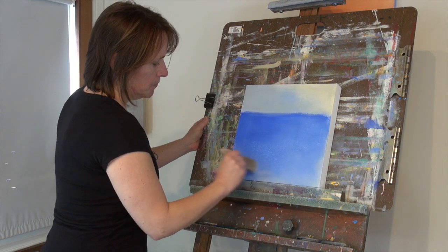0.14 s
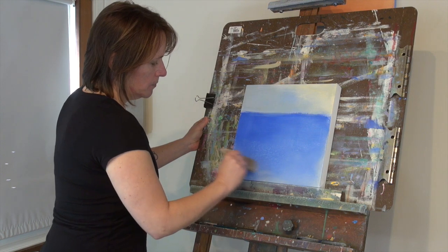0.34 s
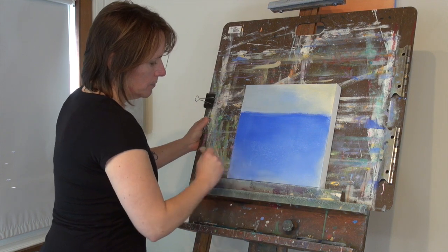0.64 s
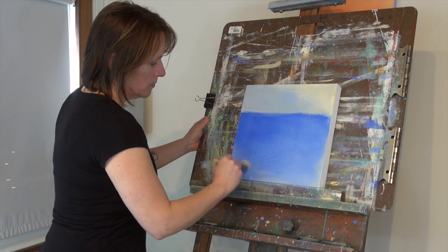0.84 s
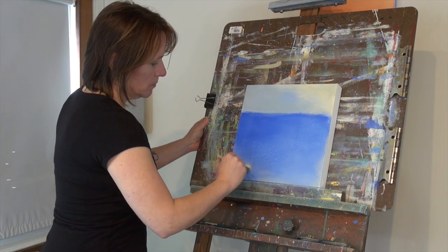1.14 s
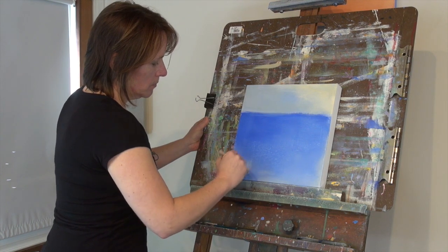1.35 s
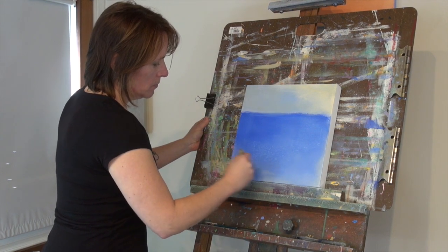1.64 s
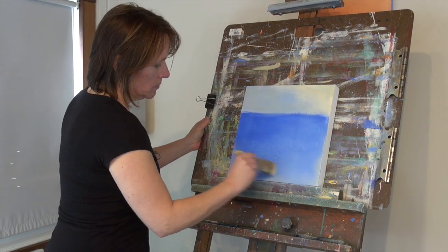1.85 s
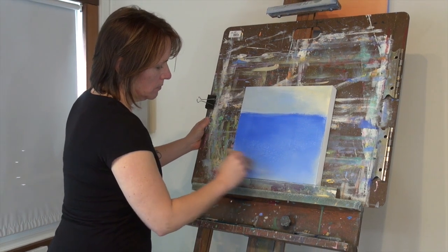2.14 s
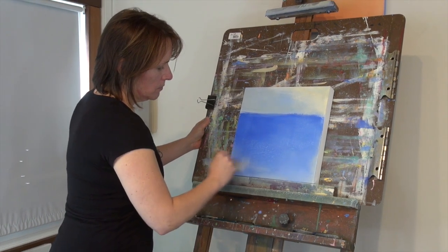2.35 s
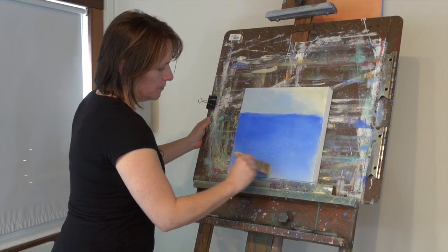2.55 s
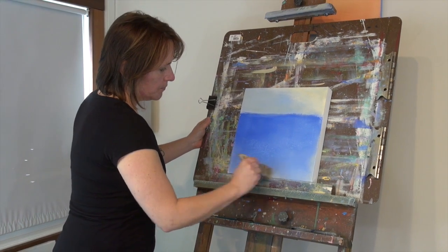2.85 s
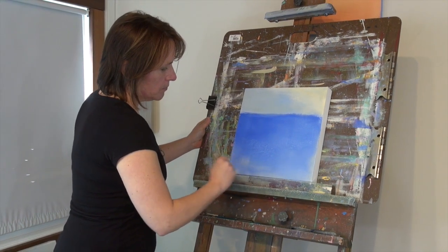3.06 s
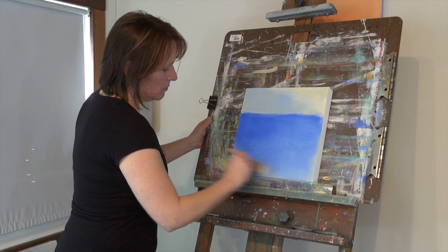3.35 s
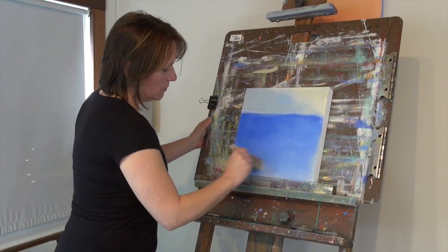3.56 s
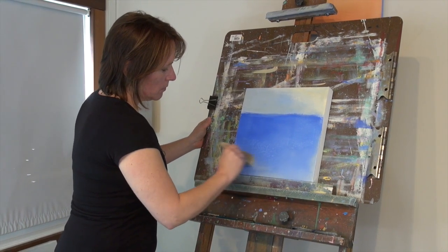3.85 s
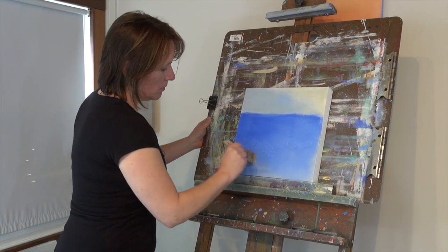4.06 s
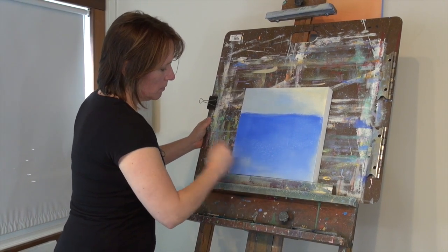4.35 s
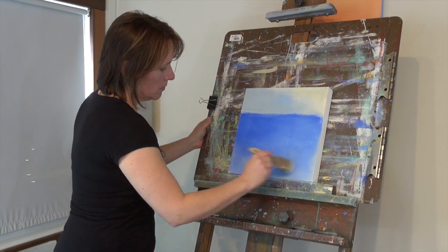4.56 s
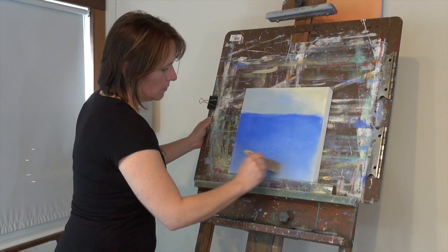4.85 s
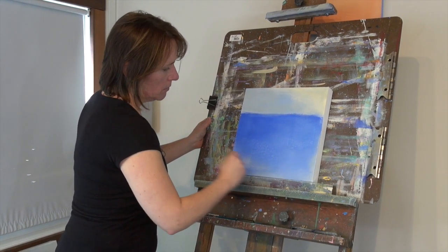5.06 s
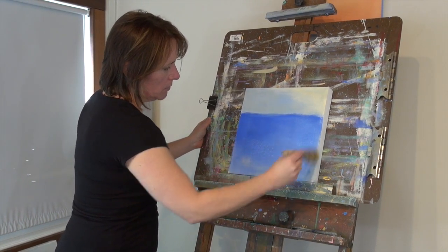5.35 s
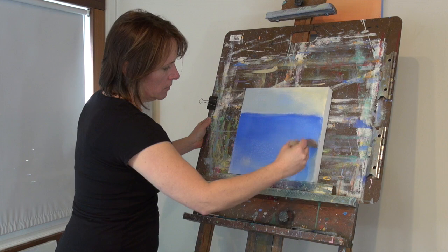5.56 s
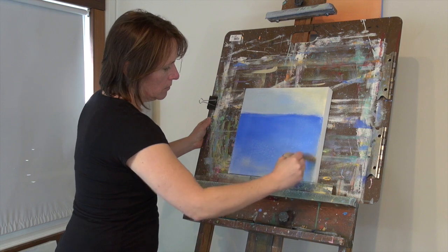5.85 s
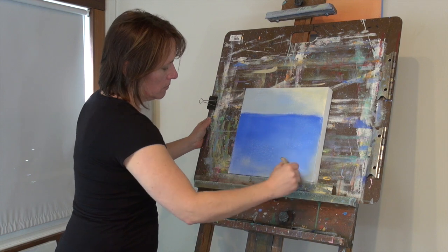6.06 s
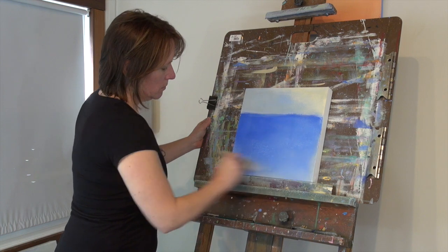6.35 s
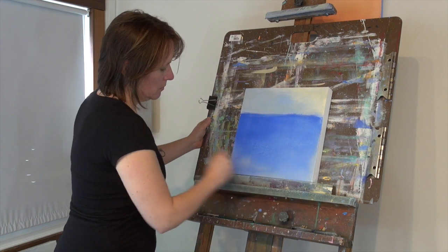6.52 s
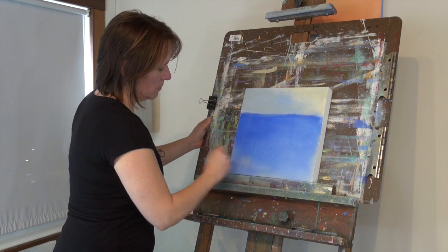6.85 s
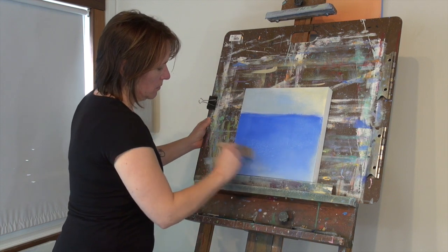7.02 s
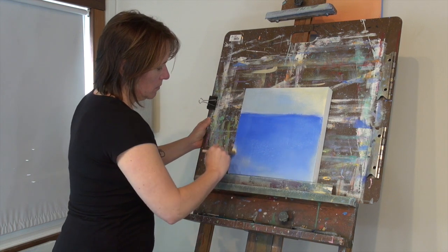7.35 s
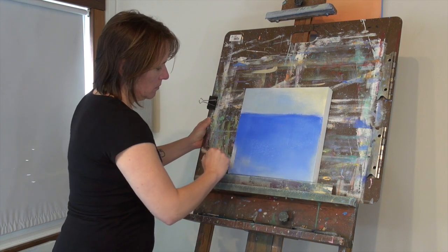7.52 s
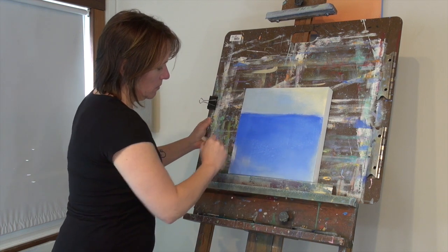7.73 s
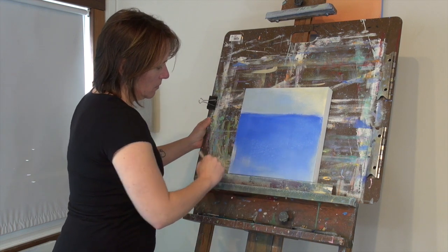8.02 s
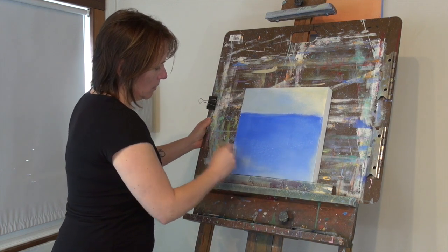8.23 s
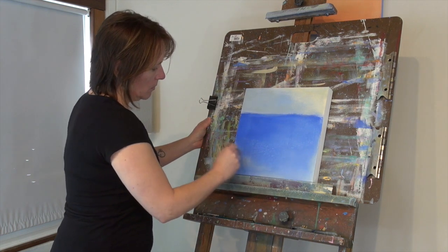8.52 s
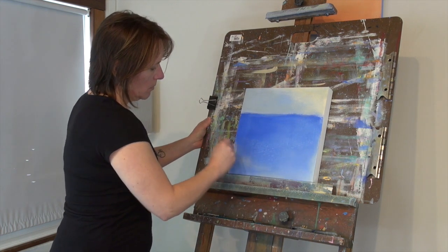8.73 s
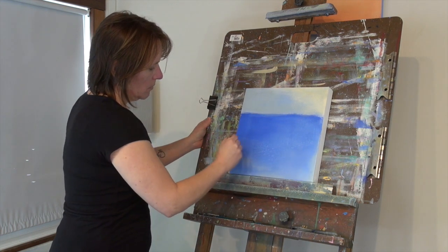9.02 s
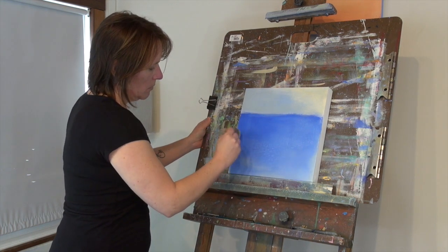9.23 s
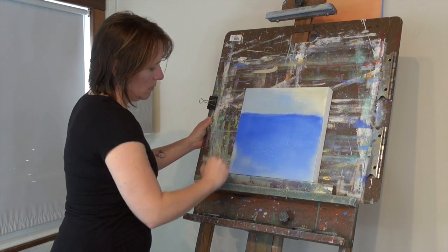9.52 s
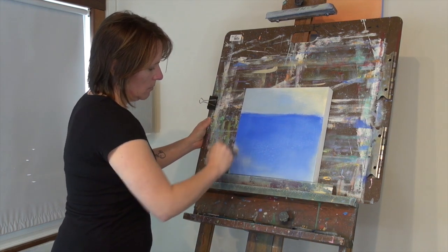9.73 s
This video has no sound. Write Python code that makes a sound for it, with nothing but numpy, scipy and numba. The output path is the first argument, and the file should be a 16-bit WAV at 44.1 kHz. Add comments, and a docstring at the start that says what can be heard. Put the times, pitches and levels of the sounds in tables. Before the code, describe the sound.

In a quiet studio, a brush scrubs textured canvas with brisk, dry swishes of about a tenth to a quarter second. Soft hollow knocks on cloth and frame punctuate them, with occasional brief rising rasps. The middle opens into gaps with lighter touches, then uneven strokes and taps continue to the end. Near microphone, same in both ears, slight room tail, steady faint room noise.

```python
"""A dry bristle brush is swept back and forth over a small stretched canvas on an easel, in a quiet studio.
Each stroke presses on, swells or eases, and lifts off: random clicks make the bristles' scratch and the tips' hiss,
and feed resonances that make the cloth drum and its frame ring. Bent bristles rasp now and then.
The brush often lands with a soft tap, made of fading tones and a short tick of noise.
A short echo of the room follows, over faint steady room noise, hum and thin whines."""
import sys
import numpy as np
from scipy import signal
from scipy.fft import rfft, irfft, next_fast_len
from scipy.io import wavfile
from scipy.ndimage import uniform_filter1d
from numba import njit

SR = 44100
rng = np.random.default_rng(int(sys.argv[2]) if len(sys.argv) > 2 else 0)


def master(y):
    """Save y as 16-bit WAV."""
    cut = np.clip(np.atleast_2d(y).T, -1, 1)
    pcm = np.round(cut * 32767)  # scale
    wavfile.write(sys.argv[1], SR, pcm.astype(np.int16))


N = 435755
T = np.arange(N) / SR  # time of every sample, in seconds

# landings or knocks on the edge, where the bristles splay in a short burst of scratch and hiss:
# (start_s, dent_db, pitch_hz, thud_db, tick_db and ring_db relative to the dent, splay_scratch_db, splay_hiss_db);
# overall gains are added later to the dent and thud levels; the splay levels are used as they stand
LANDINGS = [(0.161, -37, 580, -60, -5, 4, -44, -44.5), (0.272, -31.5, 595, -77.5, -5.5, -16.5, -51, -57),
            (0.401, -28, 519, -59.5, -9.5, -6, -43, -48), (0.703, -36.5, 1800, -79, -1, -15, -53, -58),
            (0.892, -34, 512, -78, -27, 0, -47, -57), (0.902, -29, 448, -54.5, 2, 1.5, -43, -62),
            (1.037, -50, 507, -72, -5, 5.5, -64.5, -67), (1.086, -38, 599, -64, -8, -5, -60.5, -73),
            (1.309, -42.5, 544, -64.5, -1, 1, -65.5, -72), (1.328, -30, 526, -61, -2, -4, -57, -66),
            (1.619, -43, 510, -77, -10.5, 7.5, -58, -72), (2.504, -31, 590, -75, -12.5, -3.5, -54, -49),
            (3.553, -31, 608, -82, -13.5, -13, -56, -56), (3.838, -30, 508, -56.5, -12, -11, -43.5, -42),
            (4.067, -30, 553, -56.5, -15.5, -10, -40, -42), (4.269, -31, 1497, -63.5, 1, -6.5, -54, -51),
            (4.47, -51.5, 896, -75, -10.5, 4.5, -70, -63), (4.843, -44, 1454, -64.5, -8.5, 3, -54, -59),
            (4.988, -43, 607, -78, -11.5, -4, -66.5, -68), (5.13, -44, 571, -82, -10.5, -3, -72, -56.5),
            (5.397, -57.5, 900, -88, 8, -10.5, -67, -62), (5.981, -36, 566, -69, -0.5, -3, -55.5, -66),
            (6.613, -38.5, 1220, -83.5, -12.5, 2.5, -51, -56.5),
            (6.956, -40.5, 650, -82, -10, 6, -63, -49.5), (7.276, -42, 970, -60.5, -5, -1, -48, -57),
            (7.634, -33, 1800, -63, 2.5, -6, -47, -60), (7.939, -42, 466, -80, -9, 4.5, -60, -55),
            (8.301, -39.5, 943, -52.5, -11.5, 7, -48.5, -58.5),
            (8.556, -39, 1079, -74, -0.5, -2, -52.5, -55.5), (8.689, -46, 620, -84, -5.5, 3, -61, -64),
            (8.8, -47.5, 495, -66, 6, 0.5, -56, -49), (9.048, -47, 390, -62, -4.5, -7, -60.5, -50.5),
            (9.44, -39.5, 490, -77, -12.5, 3, -59, -50), (9.761, -34.5, 568, -65, -14.5, -1, -54, -52)]
# ringing modes of the canvas on its frame: (pitch_hz, width_hz, level_db)
FRAME_MODES = [(246.7, 10.96, -12.5), (441.2, 13.5, -4), (523, 83, -12), (677.3, 30, 1.5), (905.5, 55, 7.5),
               (943, 97, 6.5), (1180, 43.4, 4), (1464, 46, 4.5), (1610, 40, -31), (1810, 50, -38.5),
               (1960, 34, -9), (2647, 75, -28.5)]
# low ringing modes of the easel: (pitch_hz, width_hz, level_db)
EASEL_MODES = [(123, 15.4, -0.5), (166.6, 23, 4), (257, 30, 6.5)]


def brush():
    """Tufts grip and slip together; their clicks are heard directly and through cloth, frame and easel."""
    # colours of the bristles' scratch and of their tips: (pitch_hz, level_db)
    scratch_colour = [(80, -38), (200, -25.5), (400, -12.5), (800, -8), (1400, -4), (2000, 0), (2800, 0),
                      (3800, -0.5), (4700, -3.5), (5400, -7), (7200, -12), (10000, -13), (16000, -37)]
    tips_colour = [(3000, -26), (5500, -7), (7500, -10.5), (9200, -7), (11000, 0.5), (13000, 0.5),
                   (15000, 0.5), (16000, -2.5)]
    # how well the small skin radiates; little bass, so its hump has steep sides: (pitch_hz, level_db)
    skin_colour = [(150, -4.5), (280, -4), (380, -1), (660, 1), (800, -8), (1200, -5.5)]
    (lower_gain, upper_gain, tips_gain, cloth_gain, frame_gain), cloth_hz = hand()
    tufts = undb(0.7 * walk(260) + 0.5 * walk(45))

    scratch = unit(colour(tufts * catches(per_s=9000, spread_db=2), scratch_colour))
    upper = colour(scratch, [(1500, -16), (2300, -20), (3200, 3)])
    lower = scratch - upper
    tips = unit(colour(tufts * catches(per_s=16000, spread_db=5.0), tips_colour))
    bristles = glance(lower_gain * lower + upper_gain * upper + tips_gain * tips)

    push = tufts * catches(per_s=3500, spread_db=3)
    cloth_hz = cloth_hz * np.exp(0.0784 * walk(22))  # the pitch wanders
    drumming = resonate(resonate(push, cloth_hz, 285), cloth_hz, 494)
    cloth = unit(colour(drumming, skin_colour))
    rumble = unit(sum(undb(db) * resonate(push, hz, width) for hz, width, db in EASEL_MODES))
    cloth_and_easel = cloth + undb(-33) * rumble

    wood = unit(frame(tufts * catches(per_s=4500, spread_db=2.5), shifting_db=3.0))
    return bristles + lower_gain * rasp(push) + cloth_gain * cloth_and_easel + frame_gain * wood


def hand(lower_share=0.133, upper_share=0.8):
    """Strokes and splays set the gains of lower scratch, upper scratch, tips, cloth and frame, and the cloth's pitch."""
    # one row per stroke or brief touch: (start_s, length_s, attack_s, release_s, scratch_db, swell_db,
    # hiss_db, flick_db, cloth_db, frame_db, cloth_pitch_hz); swell and flick are the change of level and of
    # tip hiss from start to end; hiss, cloth and frame are relative to the scratch, before the layer levels below
    strokes = [(0.0, 0.0967, 0.11, 0.056, -49.5, 5, -0.5, -2, 1.5, -4.5, 530),
               (0.138, 0.0738, 0.091, 0.042, -46.0, 3.5, -2.5, -9.5, 0, -3, 567),
               (0.25, 0.1053, 0.088, 0.045, -50.5, -5.5, -1, -6, 2, -1.5, 510),
               (0.375, 0.1043, 0.0527, 0.073, -47, 11, -1, -18, -0.5, -10.5, 580),
               (0.52, 0.1237, 0.16, 0.021, -47, 2.5, 3, 10, -4, -2.5, 548),
               (0.885, 0.0617, 0.136, 0.0772, -47, 11, -3, 1, 6, -1, 488),
               (1.093, 0.1246, 0.0232, 0.0635, -51.5, 0, -5.5, 11, 6, -1, 477),
               (1.309, 0.1377, 0.0454, 0.034, -49.5, -5, -5.5, 20.5, 3.5, -3, 446),
               (1.614, 0.26, 0.14, 0.087, -47.5, -3.5, -2.5, -7.5, 4.5, -3, 551),
               (1.908, 0.1835, 0.135, 0.0396, -47.5, 5, 1, 7, 1, -0.5, 590),
               (2.127, 0.1588, 0.0514, 0.047, -46.5, 9, -0.5, -19, -1, -1.5, 640),
               (2.315, 0.13, 0.032, 0.043, -48.5, 11, -1, 8.5, -2, -3.5, 590),
               (2.484, 0.12, 0.08, 0.0646, -44, 3, -1.5, -14.5, -1, -5, 600),
               (2.64, 0.1323, 0.131, 0.037, -45.5, 1.5, -1.5, 8.5, -4, -3.5, 650),
               (2.802, 0.1552, 0.077, 0.049, -46, -1, -1, -11, -0.5, -5.5, 647),
               (2.989, 0.14, 0.107, 0.044, -46, 1, -1.5, 13, -5.5, -7.5, 632),
               (3.16, 0.1491, 0.07, 0.046, -47.5, 9.5, -1.5, -10, -6, -7.5, 550),
               (3.369, 0.1386, 0.082, 0.036, -47, 0, -0.5, 6.5, -2.5, -5, 614),
               (3.536, 0.12, 0.0506, 0.0253, -47.5, 2, -2, -5, -1, -5, 577),
               (3.677, 0.1106, 0.104, 0.036, -45.5, 0, -2, -3.5, 3.5, -3, 613),
               (3.811, 0.0836, 0.089, 0.0212, -45.5, 4.5, -2.5, -11.5, 0.5, -5.5, 578),
               (3.914, 0.081, 0.036, 0.07, -49, 10.5, -1.5, 1, 2.5, -4.5, 525),
               (4.047, 0.0888, 0.046, 0.015, -47, 2, -1.5, -8.5, -2, -2, 526),
               (4.151, 0.12, 0.06, 0.019, -49.5, 4, 1.5, 18, -3, -1, 550),
               (4.467, 0.1125, 0.0487, 0.021, -47, -1.5, 3.5, -0.5, -6.5, -10, 566),
               (4.661, 0.1, 0.0955, 0.0183, -45, -0.5, 2.5, 3, -4, -8.5, 610),
               (4.842, 0.1, 0.0358, 0.047, -45.5, 5.5, -0.5, -8, -3.5, -9, 689),
               (4.97, 0.0903, 0.098, 0.023, -49.0, 1, -2.5, 8.5, -1.5, -7.5, 650),
               (5.134, 0.1792, 0.0385, 0.0428, -46.5, 4.5, -4, 3, -4, -7, 641),
               (5.641, 0.16, 0.015, 0.035, -53.5, 9.5, -2.5, 2, -11, -2.5, 580),
               (5.971, 0.098, 0.003, 0.0504, -53.5, 10.5, -6.5, 13.5, -6, -0.5, 573),
               (6.302, 0.1782, 0.0302, 0.0203, -48.0, 6.5, 0.5, 16, -4, -7.5, 616),
               (6.611, 0.1035, 0.03, 0.035, -47, -2, 0.5, -1.5, -7, -2.5, 604),
               (6.799, 0.083, 0.091, 0.025, -43.5, 0.5, 3.5, 6.5, -9, -2.5, 590),
               (6.948, 0.1208, 0.046, 0.028, -48.5, -6, 0.5, -8, -4, -5.5, 526),
               (7.272, 0.32, 0.0062, 0.053, -57, 10, 3.5, -13.5, -1.5, 6, 560),
               (7.546, 0.0775, 0.105, 0.0472, -48, 13, 4, 13, -2, -2, 613),
               (7.938, 0.0753, 0.0163, 0.026, -56.5, 8, 10, 10.5, -8, -3.5, 565),
               (8.05, 0.01, 0.019, 0.0343, -48.5, 1.5, -3, 4, -5.5, -23, 560),
               (8.084, 0.019, 0.0333, 0.022, -55.0, 1, 1.5, 5, -7, -17, 550),
               (8.296, 0.1011, 0.0584, 0.0333, -50.5, 1.5, 1, 0.5, -5, -2.5, 516),
               (8.547, 0.1034, 0.0884, 0.0638, -51, 10, 4.5, -9.5, -1.5, -1, 512),
               (8.811, 0.083, 0.07, 0.06, -50.5, 9.5, 2.5, -5, -1, -0.5, 586),
               (9.06, 0.0934, 0.06, 0.042, -54, 7, 5, -4, -0.5, 3, 436),
               (9.322, 0.08, 0.008, 0.018, -77.5, 2.5, 6, 2, -8, -4, 560),
               (9.435, 0.13, 0.13, 0.0617, -47, 1.5, 5.5, -1, -8, -2.5, 500),
               (9.75, 0.13, 0.14, 0.0064, -50, 0, 4, 9.5, -2, 4, 518)]
    scratch_layer_db, tips_layer_db, cloth_layer_db, frame_layer_db = 0.14, -0.6557, -0.53, 0.5
    cloth_fade_db, frame_fade_db = -4.5, -0.5  # change over a stroke, as the brush gathers speed
    bright_db, bright_per_hiss = -0.5, 0.24  # a brush on its tips scratches brighter (dB per dB of hiss)
    cloth_law = 0.927  # power of the pressure; the cloth still murmurs where the brush turns round
    pitch_rise, pitch_arc = 0.04, 0.08  # shares: climb over a stroke, and arch where the hand is fastest
    splay_rise_s, splay_decay_s, splay_cloth_db = 0.0024, 0.013, 1.5  # the push on the cloth is re its scratch

    power = np.zeros((5, N))
    pitch = np.full(N, np.median([row[-1] for row in strokes]))
    for start, length, attack, release, level_db, swell_db, hiss_db, flick_db, cloth_db, frame_db, hz in strokes:
        span = slice(*np.searchsorted(T, [start, start + length + 3 * release]))
        age = T[span] - start
        along = np.clip(age / length, 0, 1) - 0.5  # -0.5 at the start of the stroke, 0.5 at its end
        press = pressure(age, length, attack, release)
        hiss = hiss_db + flick_db * along
        bright = bright_db + bright_per_hiss * hiss
        layers = [press * undb(scratch_layer_db - lower_share * bright),
                  press * undb(scratch_layer_db + upper_share * bright),
                  press * undb(tips_layer_db + hiss),
                  press ** cloth_law * undb(cloth_layer_db + cloth_db + cloth_fade_db * along),
                  press * undb(frame_layer_db + frame_db + frame_fade_db * along)]
        # overlapping strokes add as powers
        power[:, span] += (undb(level_db + swell_db * along) * np.array(layers)) ** 2
        arch = np.cos(np.pi * along) - 2 / np.pi
        pitch[span] = hz * (1 + pitch_rise * along + pitch_arc * arch)

    for start, *_, scratch_db, hiss_db in LANDINGS:
        span = slice(*np.searchsorted(T, [start, start + 10 * splay_decay_s]))
        age = T[span] - start
        splay = (1 - np.exp(-age / splay_rise_s)) * np.exp(-age / splay_decay_s)
        gains = undb([scratch_db, scratch_db, hiss_db, scratch_db + splay_cloth_db])
        power[:4, span] += np.outer(gains, splay) ** 2
    return np.sqrt(power), pitch


def pressure(age, length, attack, release, lift_slope=3.287):
    """The bristles bend onto the cloth, stay, and lift off smoothly (slope in nepers per release time)."""
    press_on = np.sin(np.pi / 2 * np.clip(age / attack, 0, 1))
    lift_off = 0.5 - 0.5 * np.tanh(0.5 * lift_slope * (age - length) / release)
    return press_on * lift_off


def catches(per_s, spread_db):
    """Single bristles snap off threads of the weave: dense clicks of uneven size."""
    clicks = rng.random(N) < per_s / SR
    sizes = undb(spread_db * rng.standard_normal(N))
    return unit(clicks * rng.choice([-1, 1], N) * sizes)


def frame(push, shifting_db):
    """The canvas and its frame ring in their modes; a moving brush crosses each mode's nodes and bellies."""
    out = 0
    for hz, width, db in FRAME_MODES:
        shifting_push = push * undb(shifting_db * walk(14))
        out = out + undb(db) * resonate(shifting_push, hz, width)
    return out


def rasp(push, width_hz=250):
    """Where bristles bend hard or cross the canvas edge, their resonance rises as their free length shortens."""
    # one swell each: (middle_s, length_s, level_db relative to the lower scratch gain, start_hz, end_hz)
    rasps = [(1.63, 0.015, 10.5, 1200, 1410), (4.265, 0.02, 3, 1400, 1670),
             (4.537, 0.042, -2.5, 1290, 1770), (4.851, .006, 5, 1500, 1690), (4.914, 0.051, -6, 1240, 1690),
             (5.247, 0.053, -2, 720, 860), (5.77, 0.112, -2.5, 1970, 2120),
             (6.058, 0.053, -0.5, 2000, 2090), (6.443, 0.064, -5, 1270, 1700), (7.484, 0.14, 3, 994, 1360),
             (7.638, .015, -9, 1710, 1800)]
    out = 0
    for middle, length, db, start_hz, end_hz in rasps:
        hz = np.interp(T, [middle - length, middle + length], [start_hz, end_hz])
        swell = np.exp(-((T - middle) / length) ** 2)
        out = out + undb(db) * swell * unit(resonate(push, hz, width_hz))
    return out


def glance(x, lag_s=0.0014, swing=0.307, share=0.376):
    """The drawing board reflects the brush over a short path that changes as the hand moves: a sliding comb."""
    lag = lag_s * np.exp(swing * walk(6))
    reflection = np.interp(T - lag, T, x)
    return (x + share * reflection) / np.hypot(1, share)


def taps(contact_s=0.001065, damping=0.1, tick_s=0.0039, jolt_s=0.0062, thud_gain_db=3, gain_db=-3):
    """Each landing dents the cloth, rings the frame, jolts the easel and snaps the bristles."""
    # modes of a struck spot: (multiple of its pitch, level_db)
    dent_modes = [(1, 4.5), (1.59, -8.5), (2.3, -12)]
    # colour of the bristles' tick on landing: (pitch_hz, level_db)
    tick_colour = [(100, -12), (500, -18), (1400, -6), (2200, 7.5), (4200, 3.5), (7000, -61), (15000, 0.5)]
    out = np.zeros(N + SR)
    t = np.arange(SR // 5) / SR
    ring = struck(t, FRAME_MODES, contact_s)
    thud = struck(t, EASEL_MODES, jolt_s)
    for start_s, dent_db, hz, thud_db, tick_db, ring_db, *_ in LANDINGS:
        modes = [(ratio * hz, damping * hz, db) for ratio, db in dent_modes]
        dent = struck(t, modes, contact_s)
        tick = crest(colour(rng.standard_normal(len(t)) * np.exp(-t / tick_s), tick_colour))
        knock = dent + undb(ring_db) * ring + undb(tick_db) * tick
        start = int(start_s * SR)
        out[start:start + len(t)] += undb(dent_db + gain_db) * knock + undb(thud_db + thud_gain_db) * thud
    return out[:N]


def struck(t, modes, contact_s):
    """Modes (pitch_hz, width_hz, level_db) ring freely after a soft blow; wider ones fade faster; peak 1."""
    ringing = sum(undb(db) * np.sin(2 * np.pi * hz * t) * np.exp(-np.pi * width * t) for hz, width, db in modes)
    return crest(ringing * (1 - np.exp(-t / contact_s)))


def studio(x, t60_s=0.351, wet_db=-15, first_s=0.00367):
    """Walls return a short, duller tail: noise that fades by 60 dB in t60_s."""
    t = np.arange(SR // 2) / SR
    tail = rng.standard_normal(len(t)) * undb(-60 * t / t60_s) * (t > first_s)
    tail = tail / np.sqrt(np.sum(tail ** 2))
    tail = colour(tail, [(200, -1.0), (2500, 2.5), (6000, 0.5), (14000, -9)])
    return x + undb(wet_db) * signal.fftconvolve(x, tail)[:N]


def background(air_db=-69):
    """Room noise is coloured noise that wavers very slightly; hum and whines are steady sine tones."""
    # colour of the room noise: (pitch_hz, level_db)
    air_colour = [(25, -31.5), (45, -8), (65, -14), (100, 5), (160, -2.5), (300, 5), (500, -0.5),
                  (1000, -4), (2000, -8), (4000, -11), (8000, -13.5), (16000, -15.5)]
    # mains hum and thin electrical whines: (pitch_hz, level_db)
    hum_tones = [(50, -92), (100, -94.5), (150, -88), (3198, -84), (13855, -100.5)]
    air = unit(colour(rng.standard_normal(N), air_colour)) * undb(air_db + 0.057 * walk(4.1))
    hum = sum(undb(db) * unit(np.sin(2 * np.pi * hz * T)) for hz, db in hum_tones)
    return air + hum


def undb(db):
    """Decibels to gain."""
    return 10 ** (np.asarray(db) / 20)


def unit(x):
    """Scale to an rms level of 1."""
    return x / np.sqrt(np.mean(x ** 2))


def crest(x):
    """Scale to peak 1."""
    return x / abs(x).max()


def walk(rate):
    """Random levels, each held for 1 / rate seconds, smoothed twice and scaled to rms 1."""
    hold = max(int(SR / rate), 1)
    steps = np.repeat(rng.standard_normal(N // hold + 1), hold)
    smooth = uniform_filter1d(uniform_filter1d(steps, hold), hold)
    return unit(smooth[:N])


def colour(x, points):
    """Filter by a spectrum drawn through (pitch_hz, level_db) points."""
    hz, db = np.transpose(points)
    size = next_fast_len(len(x), True)
    f = np.maximum(np.arange(size // 2 + 1) * SR / size, 1)
    gain = undb(np.interp(np.log(f), np.log(hz), db))
    return irfft(rfft(x, size) * gain, size)[:len(x)]


@njit
def svf(x, hz, width):
    """State-variable band-pass whose centre may move every sample."""
    y, band, low = np.empty(len(x)), 0., 0.
    for i in range(len(x)):
        g, k = np.tan(np.pi * hz[i] / SR), width / hz[i]
        v = (band + g * (x[i] + 1e-18 - low)) / (1 + g * (g + k))
        band, low, y[i] = 2 * v - band, low + 2 * g * v, k * v
    return y


def resonate(x, hz, width):
    """One resonance, fixed or moving, with gain 1 at its centre."""
    return svf(x, hz * np.ones(len(x)), float(width))


def scene():
    """Brush and taps in the studio, the same in both ears."""
    mono = studio(brush() + taps()) + background()
    return np.array([mono, mono])


def record(dry):
    """The microphone drops the deepest bass (below 46 Hz); the top is cut steeply above 15800 Hz."""
    lean = signal.sosfilt(signal.butter(4, 46, "high", fs=SR, output="sos"), dry)
    return signal.sosfilt(signal.ellip(12, 0.1, 80, 15800, fs=SR, output="sos"), lean)


dry = scene()
out = record(dry)
master(out)
```